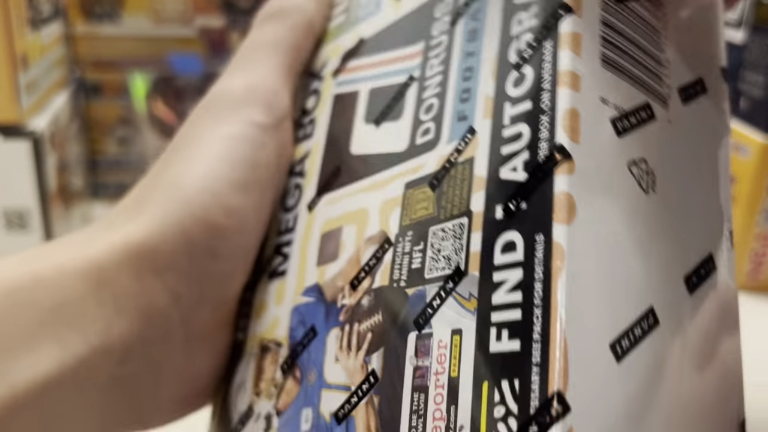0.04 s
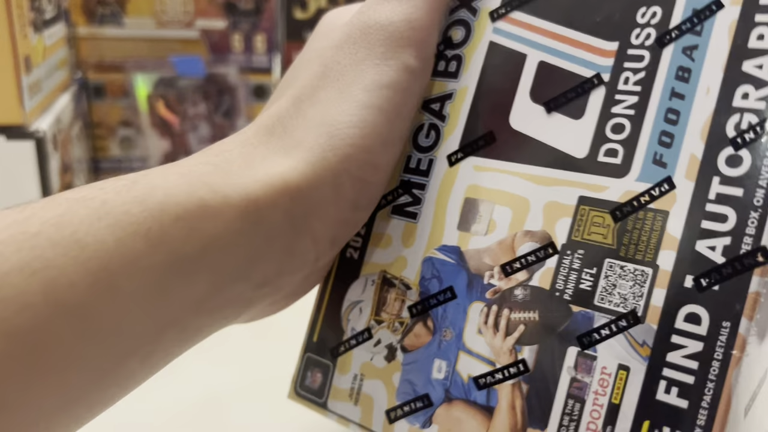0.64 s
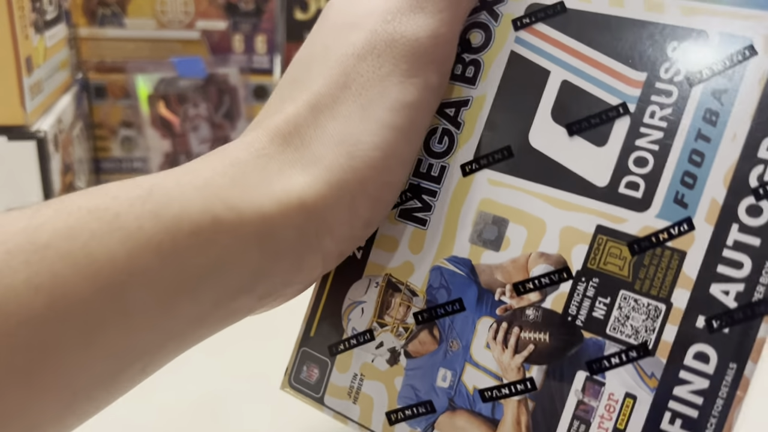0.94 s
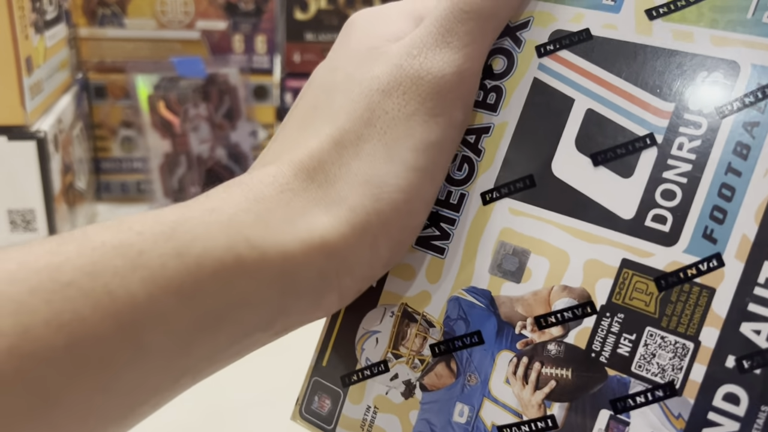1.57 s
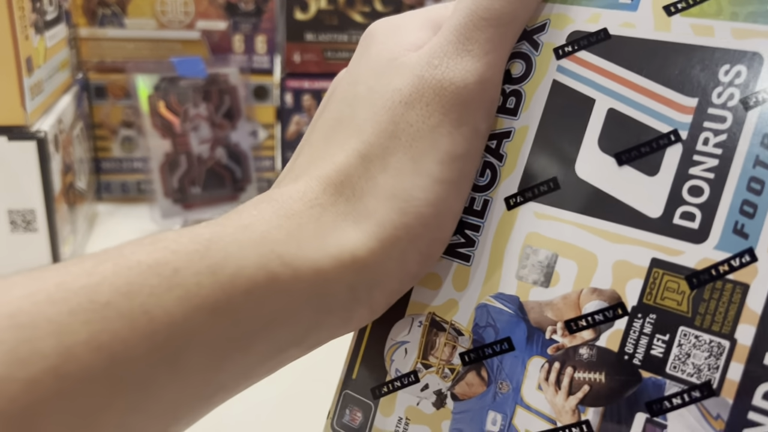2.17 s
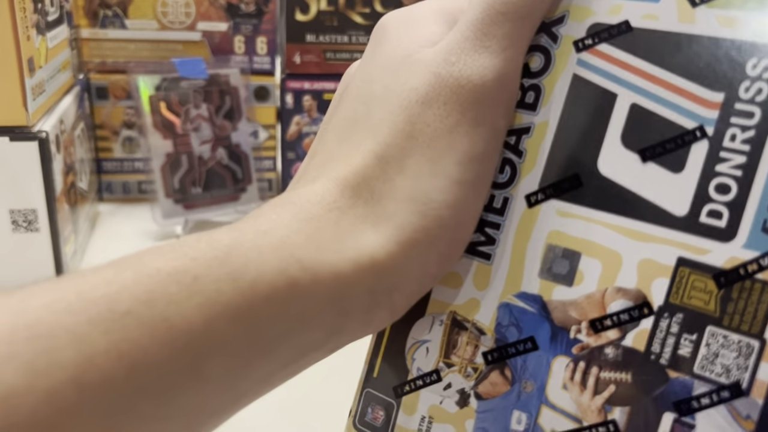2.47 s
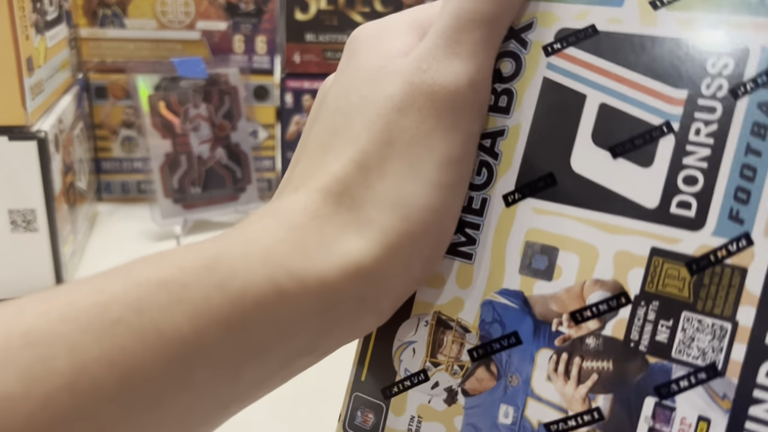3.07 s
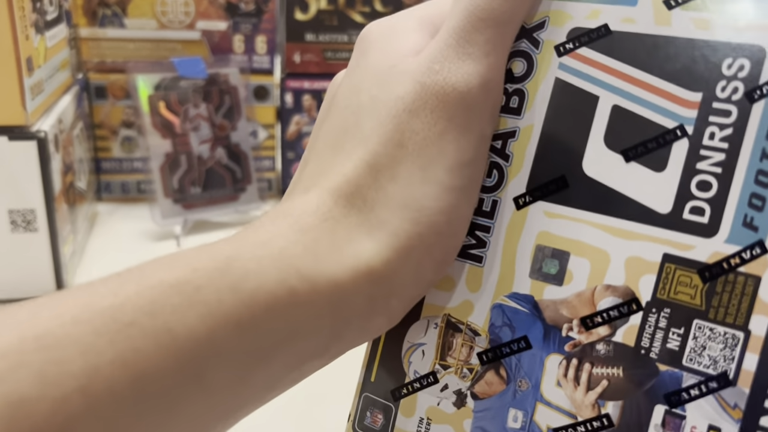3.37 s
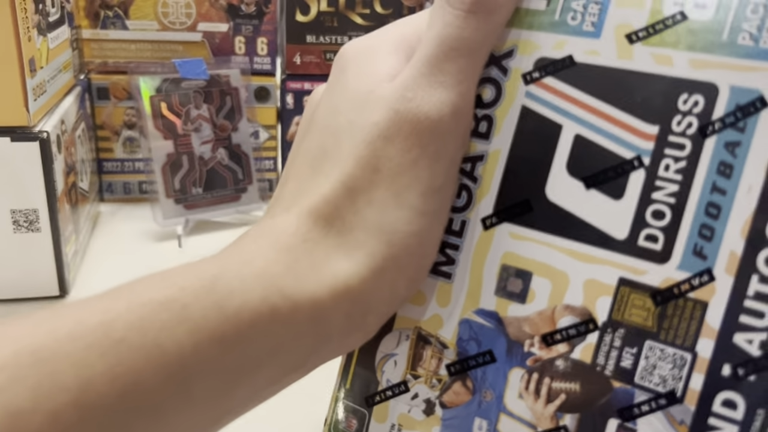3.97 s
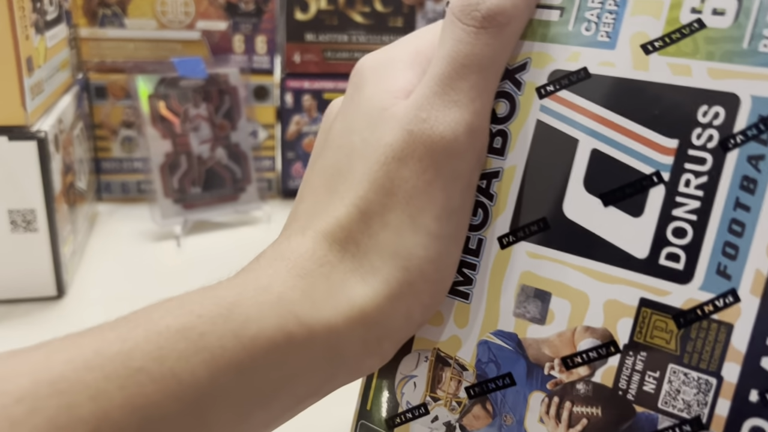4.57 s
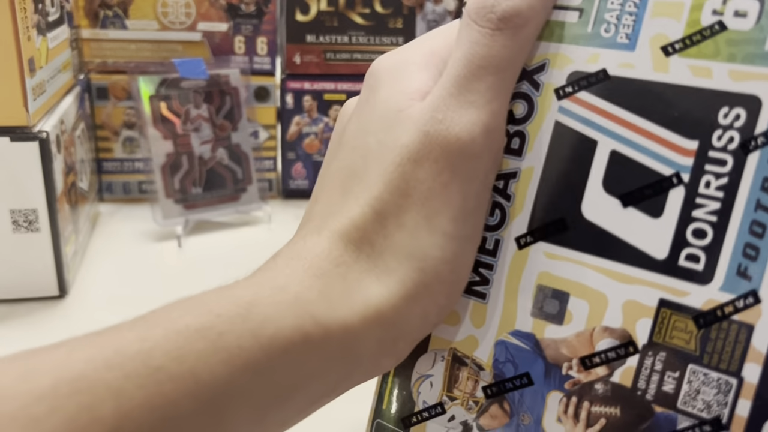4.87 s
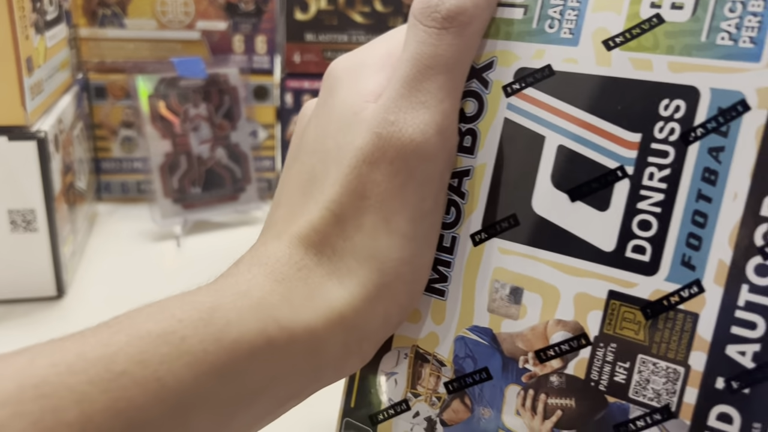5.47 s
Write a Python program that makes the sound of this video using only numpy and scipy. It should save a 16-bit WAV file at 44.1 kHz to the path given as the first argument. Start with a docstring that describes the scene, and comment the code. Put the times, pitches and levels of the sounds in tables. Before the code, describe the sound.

A shrink-wrapped cardboard box is handled close to the microphone in a small room. It starts with light taps and ticks, then at about 0.5 seconds the plastic snaps sharply and skin slides across it. Soft hollow knocks come around 1 second, followed by rubbing, crinkles and faint squeaks until 1.5 seconds. The loudest, densest crackling runs from about 1.6 to 2.3 seconds, mixed with fingertip taps. The handling then goes quieter, with scattered ticks and a small crackle near 3.3 seconds. From about 4 seconds, taps, crinkles and short rubs pick up again, leading to a sharp snap at 4.9 seconds and a dull bump with a soft rumble at 5 seconds. Only a faint rustle remains until the end, at about 5.6 seconds. A low steady rush of room air continues throughout.

```python
"""Shrink-wrap snaps and crackles as fingers turn a cardboard box close to a phone in a small room.
Creases buckle in bursts of tiny clicks; skin sticks, slips and faintly squeaks on the film. Fingertips
knock the panels, whose bending waves arrive as short falling chirps, and the dragging palm stirs the
box over a soft rumble. The room adds a brief tail and a low steady rush of air."""
import sys
import numpy as np
from scipy import signal
from scipy.fft import rfft, irfft, next_fast_len
from scipy.io import wavfile
from scipy.ndimage import uniform_filter1d

SR = 44100
rng = np.random.default_rng(int(sys.argv[2]) if len(sys.argv) > 2 else 0)


def file_out(sig):
    """Save sig as 16-bit WAV at sys.argv[1]."""
    # one column per channel
    cols = np.atleast_2d(sig).T
    # limit, then scale
    lim = np.clip(cols, -1, 1)
    pcm = np.round(lim * 32767).astype(np.int16)
    wavfile.write(sys.argv[1], SR, pcm)


N = 248459
SIZE = 4096  # samples in one short sound or filter
TIME = np.arange(N) / SR

# fingertip knocks; rim is low mid-panel, high near a stiff edge: (time [s], level [dB], rim [dB])
KNOCKS = [(0.136, -42, 22), (0.175, -46, 5), (0.263, -49.5, 3.5), (0.405, -34, 7.5), (0.532, -38, -3),
          (0.645, -49.5, 2), (0.689, -43.5, 3.5), (0.78, -45.5, 3), (0.997, -32, -13.5), (1.019, -37, -22),
          (1.107, -41.5, -11), (1.366, -48.5, -12.5), (1.802, -48.5, -3), (1.901, -44, 9.5),
          (1.948, -52, 20), (2.264, -46, -1.5), (2.312, -38.5, -5.5), (2.668, -43, 3), (2.728, -51.5, 14),
          (3.16, -48, 21.5), (3.31, -49.5, 4), (3.908, -51, 4), (3.967, -46, 5), (4.057, -42, -3.5),
          (4.136, -47, 2.5), (4.162, -43, 10), (4.228, -37, 3.5), (4.493, -52, 1.5), (4.576, -47, -5),
          (4.95, -50, 6), (5.011, -32, 15), (5.096, -51.5, 14)]
# panel and cavity modes of the box: (frequency [Hz], width [Hz], level [dB])
CARDBOARD_MODES = [(73.14, 45, -3.5), (146, 11, 8.5), (216, 125, 2.5), (330, 24, 0.5), (425, 110, -2),
                   (502.7, 140, -3.5), (600, 100, -8), (690, 440, 1), (1178, 58, -9)]


def crease_snaps(rise_s=0.0002, spike_db=4, ripple_db=5, edge_share=0.4):
    """A crease buckles in a dying burst of tiny clicks; each has its own size and so its own colour."""
    # the clearest creases: (time [s], level [dB], decay [s], low-mid body [dB], top-end air [dB])
    creases = [(0.0891, -54, 0.0016, -3, -25), (0.2647, -37.5, 0.0015, 0, -4),
               (0.3995, -43.5, 0.001, -5, 18), (0.4472, -45, 0.00086, -2, -11), (0.5057, -36, 0.0036, 9, 6),
               (0.5283, -20.5, 0.0032, 0, -1), (0.5555, -24, 0.0014, 0, 10.5), (0.563, -31, .003, -10, 12),
               (0.59, -38, 0.004, -1, -4), (0.6435, -30, 0.0015, -7, -9), (0.6506, -39.5, 0.0017, 7, -16),
               (0.9391, -40.5, 0.0036, -1, -0.5), (1.0275, -35.5, 0.0077, 5.5, 2),
               (1.0997, -29.5, 0.0037, 19, 20), (1.1191, -37.5, 0.0051, 12, -3.5),
               (1.2804, -42, 0.009, 1, -4), (1.3271, -43, 0.00093, -13, -13.5), (1.358, -35, .003, -1, 1),
               (1.3746, -36, 0.008, 3, -12), (1.4085, -32.5, 0.0057, -4, -7.5), (1.496, -45, 0.0039, 1, 16),
               (1.627, -22.5, 0.0017, -7.5, -2.5), (1.6927, -30, 0.0053, -4, 6),
               (1.7227, -39.5, .0024, -5, 0), (1.758, -32, 0.014, -11, 2.5), (1.8024, -16, 0.0015, 1, 8),
               (1.812, -24.5, .0023, 11, 19), (1.8576, -22, 0.0015, -3, 3),
               (1.8695, -27.5, 0.0094, -6, 10.5), (1.9047, -34.5, 0.0065, -1, 8),
               (1.9328, -38, .003, -7, -5), (1.9632, -37, .003, -3, 12.5), (1.993, -34, 0.0028, -7, 8),
               (2.041, -45.5, 0.001, -9, 23.5), (2.1133, -34.5, 0.0073, -2, 1.5),
               (2.147, -24, 0.0041, -0.5, 13), (2.1522, -15.5, 0.0035, -5.5, 1),
               (2.1702, -33, 0.0066, 4, 0), (2.2372, -25.5, 0.0032, 3.5, 7.5),
               (2.2449, -24, 0.0052, 2, 13.5), (2.3038, -30.5, .003, 1, -1), (2.3122, -28.5, 0.0018, 2, 5),
               (2.3525, -42, 0.0058, 9.5, -2), (2.7244, -51, 0.0018, 7.5, -5),
               (2.978, -49, 0.0056, 15.5, -2), (3.1935, -39, 0.001, -6, 10), (3.267, -50.5, .0025, -1, 4),
               (3.3529, -33.5, 0.0019, -4, -14), (3.3645, -33, 0.0034, -3.5, 2.5),
               (3.6762, -55, 0.0029, 6, -6.5), (3.8075, -56.5, .003, 1.5, -21.5),
               (4.1169, -42, 0.0014, 12, 2), (4.1302, -42, 0.0019, 6, -6), (4.1661, -36.5, .0025, 8, -19),
               (4.2182, -32, 0.0036, 4, 0), (4.2805, -34, 0.0028, -3, 2.5),
               (4.3051, -39.5, .0023, -21, -20), (4.4031, -47, 0.0025, 5, -15), (4.5114, -44, 0.0063, 3, 8),
               (4.536, -43, .003, -1, 1), (4.5633, -35.5, 0.0017, 7.5, -2.5),
               (4.6038, -41.5, 0.0033, 10.5, 5), (4.7018, -44, 0.0039, 9, -5),
               (4.7706, -42.5, .003, 10, -6), (4.8902, -21, 0.002, -3, 12.5),
               (4.895, -24.5, 0.0025, -13, -3.5), (4.9067, -30, .0043, 1.5, 3),
               (5.268, -54.5, .004, -7, 11.5)]
    # a fingertip ticks the film just before the card gives
    touches = [(s - .003, db - 12, 0.0046, 6, 0) for s, db, _ in KNOCKS]
    out, hz, t = np.zeros(N), bins(SIZE), np.arange(SIZE) / SR
    film = wrap_colour(hz)
    ripple_hz = np.linspace(0, SR / 2, 48)
    attack = int(.006 * SR)  # the first 6 ms set a snap's level
    for s, db, decay_s, body_db, air_db in creases + touches:
        clicks = rng.standard_normal(SIZE) * undb(spike_db * rng.standard_normal(SIZE))
        burst = clicks * np.exp(-t / decay_s) * (1 - np.exp(-t / rise_s))
        edge_db = edge_share * air_db
        tone = colour([(1900, body_db), (3200, 0.086), (4700, -2.2), (6500, edge_db),
                       (8500, edge_db), (11500, air_db)], hz)
        ripple = undb(ripple_db * np.interp(hz, ripple_hz, rng.standard_normal(len(ripple_hz))))
        snap = irfft(rfft(burst) * causal(film * tone * ripple))
        add(out, s, snap * undb(db) / np.sqrt(np.mean(snap[:attack] ** 2)))
    return out


def wrap_colour(hz):
    """The film's broad colour with its narrow resonances on top."""
    # tone of the taut wrap: (frequency [Hz], level [dB])
    film_tone = [(250, -16), (900, -10.5), (1550, 1), (2100, -4), (2700, -0.5), (3250, 2.5), (3900, 0.5),
                 (4600, 1.5), (5400, -5.5), (6500, -1), (8000, -4.5), (10000, 0.5), (12600, -8),
                 (15500, -5.5)]
    # resonances of the wrap on the card: (frequency [Hz], width [Hz], level [dB])
    film_modes = [(2175, 110, 2), (3307, 78, -7), (3780, 240, -9.5), (4570, 52, -6), (6290, 18, -2),
                  (7700, 69, 0.5), (8660, 30, -10), (13000, 68, -9)]
    return colour(film_tone, hz) * np.abs(1 + resonances(film_modes, hz))


def panel_knocks(soft_hz=760, detune=0.01947, vary_db=1.5, travel_s=.006):
    """A soft push on the card: high bending waves outrun low ones, so each ringing knock sags in pitch."""
    out, hz = np.zeros(N), bins(SIZE)
    # travel time shortens as 1 / sqrt(frequency); it is near travel_s at 500 Hz
    chirp = np.exp(-4j * np.pi * travel_s * np.sqrt(500 * (hz + 50)))
    soft_pad = 1 / np.sqrt(1 + (hz / soft_hz) ** 4)
    for s, db, rim_db in KNOCKS:
        # the modes shift and trade strength with where the box is held and struck
        chance = rng.standard_normal((len(CARDBOARD_MODES), 2))
        modes = [(f * (1 + detune * shift), width, mode_db + vary_db * lift)
                 for (f, width, mode_db), (shift, lift) in zip(CARDBOARD_MODES, chance)]
        panel = np.sqrt(sum(np.abs(resonances([mode], hz)) ** 2 for mode in modes))
        bass_db = 0.7 * rim_db - 0.5  # a knock near an edge also moves the whole box
        tone = colour([(20, -10.5), (60, bass_db), (200, bass_db), (300, 0), (400, 0), (500, rim_db),
                       (700, rim_db - 2.5), (800, rim_db - 15.5), (1150, rim_db + 0.5),
                       (2500, rim_db - 19)], hz)
        knock = irfft(causal(panel * tone * soft_pad) * chirp * fingertip_force())
        strength = np.sqrt(np.sum(knock ** 2) / (.03 * SR))  # rms as if packed into 30 ms
        add(out, s - travel_s, knock * undb(db) / strength)
    return out


def fingertip_force(settle_s=.0035):
    """Spectrum of a fingertip's push: first touch, then an uneven settling of the pad."""
    t = np.arange(SIZE) / SR
    settling = rng.standard_normal(SIZE) * t * np.exp(-t / settle_s)
    return 1 + .8 * rfft(settling) / np.sqrt(np.sum(settling ** 2))


def skin_rub(edge_s=.007, swell_share=0.11, flutter_db=1.5):
    """Each slide excites the film while the finger moves; the holding hand keeps up a faint rustle."""
    # film rustling under the holding hand: (time [s], level [dB])
    rustle_levels = [(0, -66.5), (.5, -62), (1.6, -63.5), (2.05, -58), (2.45, -69.5), (2.8, -74.5),
                     (3.3, -65), (3.55, -87), (4.4, -62), (4.8, -76.5), (5.15, -87), (5.63, -79)]
    # skin sliding over the wrap: (start [s], end [s], level [dB], treble [dB])
    slides = [(0.257, 0.266, -41, -16), (0.402, 0.453, -50, 10), (0.535, 0.608, -40, -1),
              (0.635, 0.659, -30.5, -1.5), (0.948, 1.028, -48, -43), (1.093, 1.139, -36, -2),
              (1.165, 1.214, -48.5, -4.5), (1.254, 1.423, -52, -7), (1.461, 1.521, -46.5, -5.5),
              (1.725, 1.832, -52.5, 1.5), (1.827, 1.879, -36, 12), (1.916, 2.007, -44, 5),
              (2.226, 2.297, -40, 2), (2.63, 2.693, -51, 5), (3.118, 3.2, -50, 3), (3.236, 3.327, -60, 6),
              (4.138, 4.215, -57.5, -8), (4.259, 4.336, -47.5, 6), (4.527, 4.575, -50.5, -1),
              (4.701, 4.75, -50, -1), (4.822, 4.905, -53, 2), (5.341, 5.499, -70.5, 14.5)]
    hz = bins(SIZE)
    film = wrap_colour(hz) * colour([(300, 8.5), (1200, 4.5), (3500, -3.5)], hz)
    friction = unit(stick_slip() + crinkle()) * undb(flutter_db * wander(50))
    out = unit(through(friction, causal(film))) * follow(rustle_levels)
    for start, end, db, treble_db in slides:
        t = np.arange(int((end - start) * SR) + int(edge_s * SR)) / SR
        swell_s = edge_s + swell_share * t[-1]
        pressure = np.clip(np.minimum(t / swell_s, (t[-1] - t) / edge_s), 0, 1)
        stroke = np.roll(friction, -int(start * SR))[:len(t)] * pressure
        tilt = colour([(1500, -treble_db / 2), (4000, 0.025), (7000, treble_db)], hz)
        ring = irfft(causal(film * tilt))
        slide = signal.fftconvolve(stroke, ring) / np.sqrt(np.sum(ring ** 2))
        add(out, start - edge_s / 2, slide * undb(db))
    return out


def stick_slip(grains_per_s=650, grain_db=1.5, grain_s=0.0027, hiss_db=-6):
    """Skin catches and lets go of the film: dense, short crackles over a fine hiss."""
    sizes = undb(grain_db * np.minimum(rng.exponential(size=N), 4))
    catches = sizes ** 2 * (rng.random(N) < grains_per_s / SR)
    power = signal.lfilter([1], [1, -np.exp(-2 / (grain_s * SR))], catches)
    return unit(rng.standard_normal(N) * (unit(np.sqrt(power)) + undb(hiss_db)))


def crinkle(ticks_per_s=45, scatter_db=3.0, tick_s=.0007, gain_db=1):
    """Small creases give way at random as the film is worked, each a brief burst of clicks."""
    sizes = undb(scatter_db * np.clip(rng.standard_normal(N), -1.5, 1.5))
    ticks = sizes * (rng.random(N) < ticks_per_s / SR)
    bursts = signal.lfilter([1], [1, -np.exp(-1 / (tick_s * SR))], ticks)
    return unit(bursts * rng.standard_normal(N)) * undb(gain_db)


def skin_squeaks(width_hz=900, slips_per_s=190, slip_s=0.0019, drag_db=-15):
    """Quick uneven slips ring one resonance of the film and swell with the finger's pressure."""
    # faint squeaks of skin on film: (start [s], length [s], pitch [Hz], level [dB])
    squeaks = [(0.632, 0.028, 6360, -38.5), (1.265, 0.026, 4250, -49.5), (1.32, 0.075, 4150, -42),
               (1.455, 0.044, 4300, -52.5), (2.857, 0.052, 4330, -64), (3.65, 0.045, 3250, -63),
               (4.298, 0.017, 1960, -48), (4.305, 0.012, 6370, -42), (4.817, 0.034, 2140, -51.5),
               (4.884, 0.018, 2040, -37.5)]
    size = 2 * SIZE
    out, hz, t = np.zeros(N), bins(size), np.arange(size) / SR
    for start, length_s, pitch_hz, db in squeaks:
        slip_times = np.r_[0, np.cumsum(rng.uniform(.3, 1.7, 128)) / slips_per_s]
        since_slip = t - slip_times[np.searchsorted(slip_times, t, side="right") - 1]
        force = rng.standard_normal(size) * (np.exp(-since_slip / slip_s) + undb(drag_db))
        peak = resonances([(pitch_hz, width_hz, 0)], hz) ** 2  # squaring narrows the peak
        ring = irfft(rfft(force) * peak)
        pressure = np.sin(np.linspace(0, np.pi, int(length_s * SR)))
        add(out, start, unit(ring[:len(pressure)] * pressure) * undb(db))
    return out


def palm_drag(flutter_db=3, gain_db=-4):
    """The dragging palm stirs the modes of the box."""
    # how hard the palm drags: (time [s], relative level [dB])
    drag_levels = [(0, -50.5), (.14, -63.5), (.55, -51), (1.4, -53.5), (1.65, -61.5), (3.3, -55.5),
                   (3.7, -58), (4.75, -51), (5.2, -57), (5.63, -55.5)]
    hz = bins(SIZE)
    soft_palm = causal(colour([(60, -17), (140, 2.5), (700, -12), (1500, -13), (4000, -28.5)], hz))
    drag = unit(through(rng.standard_normal(N), resonances(CARDBOARD_MODES, hz) * soft_palm))
    return drag * follow(drag_levels) * undb(gain_db + flutter_db * wander(25))


def box_sway(rise_s=.03, rest_db=-60, gain_db=-4):
    """The box recoils after a knock: a soft rumble swells and settles back to rest."""
    # the box recoiling after a knock: (time [s], relative level [dB], decay [s])
    lurches = [(.69, -47, 0.061), (1.21, -48.5, 0.13), (2.021, -51, .04), (2.7, -55, 0.066),
               (4.16, -55.5, .25), (5.025, -35, 0.026)]
    tone = colour([(12, -28), (30, -13.5), (70, 1), (110, -9.5), (300, -44), (1000, -71)], bins(SIZE))
    rumble = unit(through(rng.standard_normal(N), causal(tone)))
    swells = sum(undb(db) * np.exp(-np.maximum((s - TIME) / rise_s, (TIME - s) / decay_s))
                 for s, db, decay_s in lurches)
    return rumble * (undb(rest_db) + swells) * undb(gain_db)


def early_bounces(dry):
    """The first bounces reach the two microphone ports unequally, less so in the bass and the top."""
    # reflections off desk and hand: (delay [s], relative level [dB])
    bounces = [(.0013, -12), (.0031, -18.5), (.0056, -27.5), (.0083, -12.5)]
    hz = bins(SIZE)
    echoes = sum(undb(db) * np.exp(-2j * np.pi * hz * delay_s) for delay_s, db in bounces)
    tone = colour([(250, -10.5), (1000, -5), (3000, -3.5), (6000, 3.5), (9000, -15.5)], hz)
    side = through(dry, echoes * causal(tone))
    return np.array([side, -side])


def room_tail(dry, build_s=0.0033, wall_s=0.021, wall_db=4, size=24000):
    """Desk and shelves scatter the sound at once; a wall answers a little later; the bass rings longest."""
    # reverb bands: (centre [Hz], time to fall 60 dB [s], level [dB])
    bands = [(118, 0.63, -10), (410.4, 0.21, -7), (1240, 0.32, -8.5), (3680, 0.29, -10),
             (8460, 0.25, -13.5), (14000, 0.27, -15)]
    t, hz = np.arange(size) / SR, bins(size)
    diffuse, response = diffuse_noise(size), 0
    log_centres = np.log(np.array(bands)[:, 0])
    wall = undb(wall_db * np.exp(-((t - wall_s) / .003) ** 2))
    onset = (1 - np.exp(-(t / build_s) ** 2)) * wall
    for weights, (_, t60, db) in zip(np.eye(len(bands)), bands):
        envelope = onset * np.exp(-np.log(1000) * t / t60)
        band = irfft(diffuse * np.interp(np.log(hz), log_centres, weights))
        response = response + band * undb(db) * envelope / np.sqrt(np.sum(envelope ** 2))
    return signal.fftconvolve(dry[None], response, axes=1)[:, :N]


def room_air(air_db=-57, waver_db=0.24, hiss_db=-87.5):
    """A low steady rush of indoor air with a faint hiss."""
    # spectrum of the room tone: (frequency [Hz], relative level [dB])
    air_tone = [(15, -31.5), (25, -16), (76, -3.5), (228, -5), (311, -20.5), (360, -15), (461, -14),
                (533, -21.5), (727, -21), (1030, -9.5), (1470, -17.5), (1730, -18), (2570, -39.5),
                (3500, -39), (4550, -76), (7700, -120)]
    size = 2 * next_fast_len(N // 2 + 1)
    air = unit(irfft(diffuse_noise(size) * colour(air_tone, bins(size)))[:, :N])
    hiss = unit(irfft(diffuse_noise(size))[:, :N])
    return air * undb(air_db - waver_db * wander(4.3)) + hiss * undb(hiss_db)


def diffuse_noise(size, spread=.45):
    """Spectra of diffuse noise at both ports: alike in the bass, partly unrelated above."""
    mid, side = rfft(rng.standard_normal((2, size)))
    side_tone = [(60, -8), (300, -3), (1000, 7.5), (2500, -5), (6000, 7), (9000, -19.5)]
    width = spread * colour(side_tone, bins(size))
    return np.array([mid + width * side, mid - width * side]) / np.sqrt(1 + width ** 2)


def undb(db):
    """Decibels to gain."""
    return 10 ** (np.asarray(db) / 20)


def unit(x):
    """Scale to rms 1."""
    return x / np.sqrt(np.mean(x ** 2))


def bins(size):
    """Frequencies of a spectrum of this many samples."""
    return np.maximum(np.arange(size // 2 + 1) * SR / size, 1)


def colour(points, hz):
    """EQ curve through (frequency [Hz], level [dB]) points on a log-frequency axis."""
    f, db = np.transpose(points)
    return undb(np.interp(np.log(hz), np.log(f), db))


def resonances(modes, hz):
    """Summed response of damped modes."""
    return sum(undb(db) / (1 + 1j * (hz ** 2 - f ** 2) / (hz * width)) for f, width, db in modes)


def causal(gain):
    """Minimum-phase response with this gain: nothing sounds before the blow."""
    cepstrum = irfft(np.log(gain + 1e-9))
    half = len(cepstrum) // 2
    return np.exp(rfft(np.r_[cepstrum[0], 2 * cepstrum[1:half], np.zeros(half)]))


def through(x, response):
    """Filter a signal by a frequency response."""
    return signal.fftconvolve(x, irfft(response))[:N]


def follow(curve):
    """Fader ride through (time [s], level [dB]) points."""
    return undb(np.interp(TIME, *np.transpose(curve)))


def wander(steps_per_s):
    """Smooth random drift with a spread near 1."""
    hold = int(SR / steps_per_s)
    steps = np.repeat(rng.standard_normal(N // hold + 1), hold)
    return 1.3 * uniform_filter1d(uniform_filter1d(steps, hold), hold)[:N]


def add(track, s, sound):
    """Mix a sound in at a time."""
    i = max(int(s * SR), 0)
    track[i:i + len(sound)] += sound[:max(N - i, 0)]


def scene():
    """The handled box, its reflections and the room's air."""
    box = crease_snaps() + panel_knocks() + skin_rub() + skin_squeaks() + palm_drag() + box_sway()
    return box + early_bounces(box) + room_tail(box) + room_air()


def record(dry, top_hz=16000):
    """The two microphone ports differ in phase and level by frequency; the top is cut."""
    # phase between the ports: (frequency [Hz], lead of left over right [rad])
    port_phase = [(0, 0), (1550, -2.1), (1810, 0.1), (2410, 1.0), (3100, 1.2), (3700, 0.4), (5860, -0.3),
                  (7320, -0.2), (9300, -2.7), (11400, -4.5), (12000, -5.8), (13600, -6.6), (15200, -9.2),
                  (16400, -9.5)]
    # balance between the ports: (frequency [Hz], left minus right [dB])
    port_balance = [(60, 0.5), (200, -0.2), (400, 3), (700, -2), (1290, 2), (2400, 3.5), (4400, 3.5),
                    (8000, -0.16), (15000, 0)]
    size = 2 * next_fast_len(N // 2 + SIZE)
    hz = bins(size)
    lead = np.interp(hz, *np.transpose(port_phase))
    left = np.exp(.5j * lead) * np.sqrt(colour(port_balance, hz))
    ports = irfft(rfft(dry, size) * np.array([left, 1 / left]))[:, :N]
    return signal.sosfilt(signal.ellip(10, .2, 80, top_hz, fs=SR, output="sos"), ports)


dry = scene()
out = record(dry)
file_out(out)
```